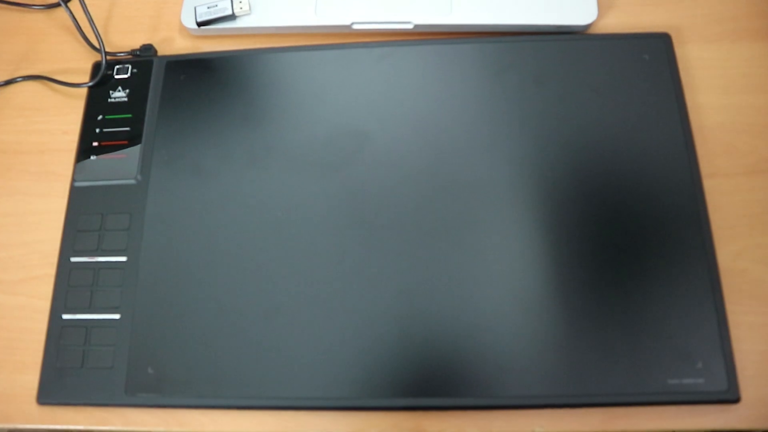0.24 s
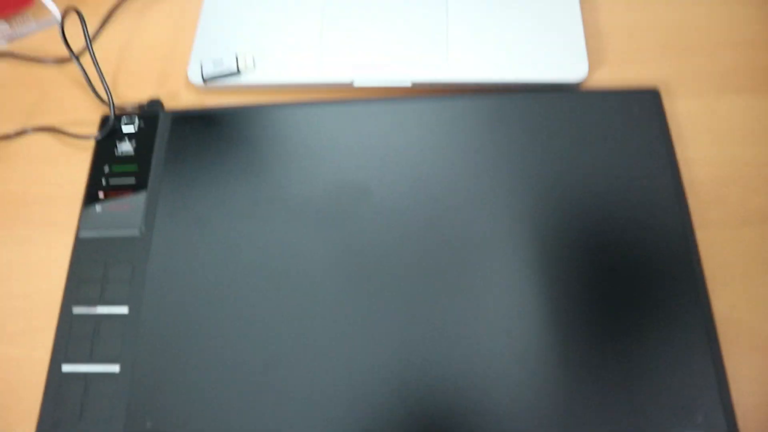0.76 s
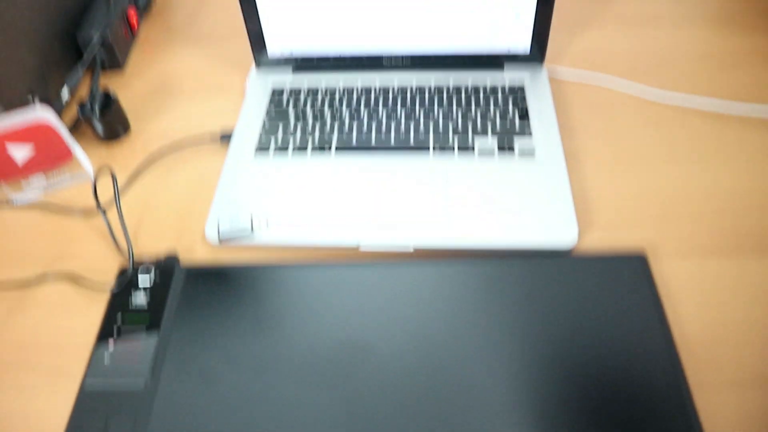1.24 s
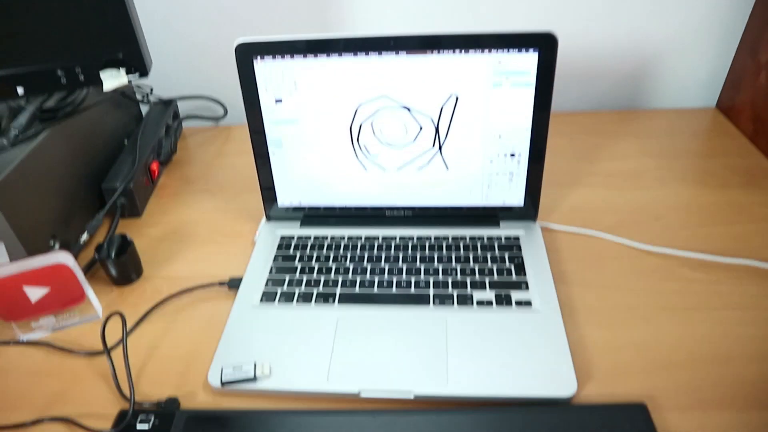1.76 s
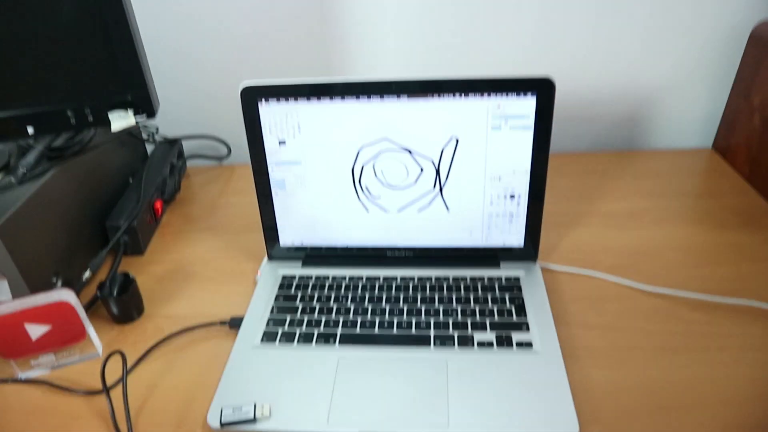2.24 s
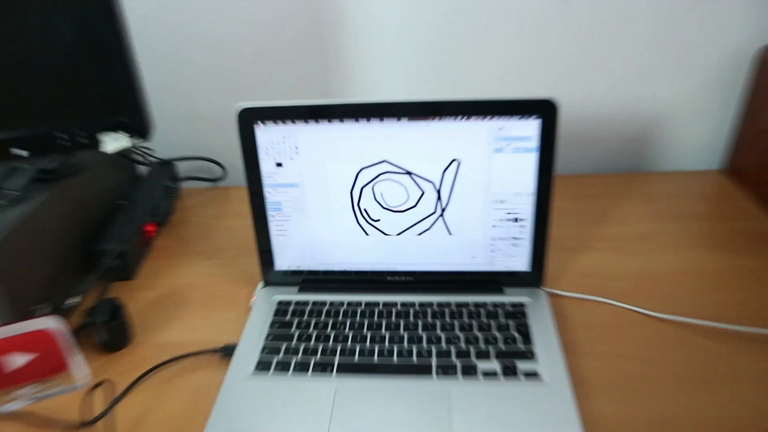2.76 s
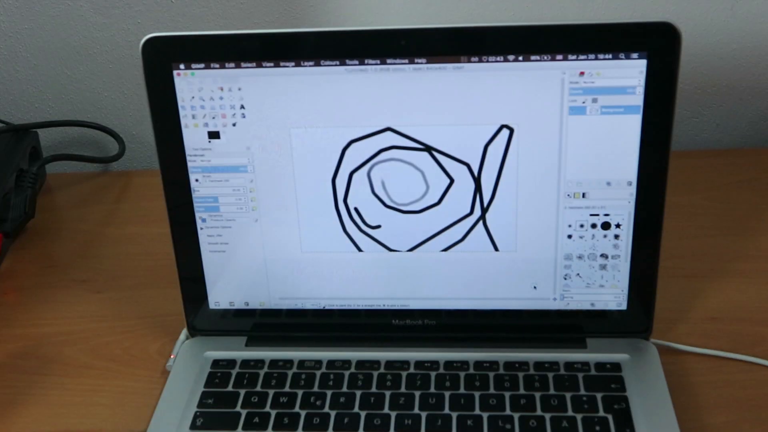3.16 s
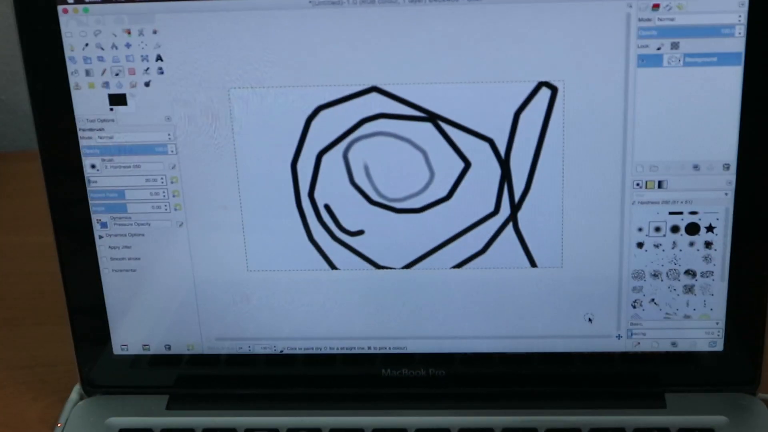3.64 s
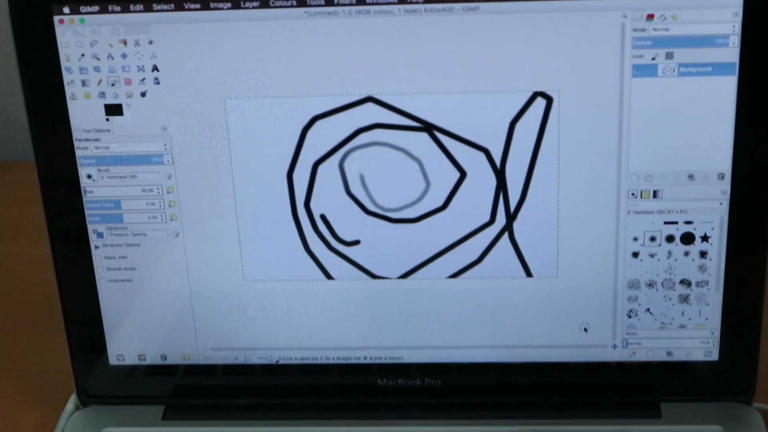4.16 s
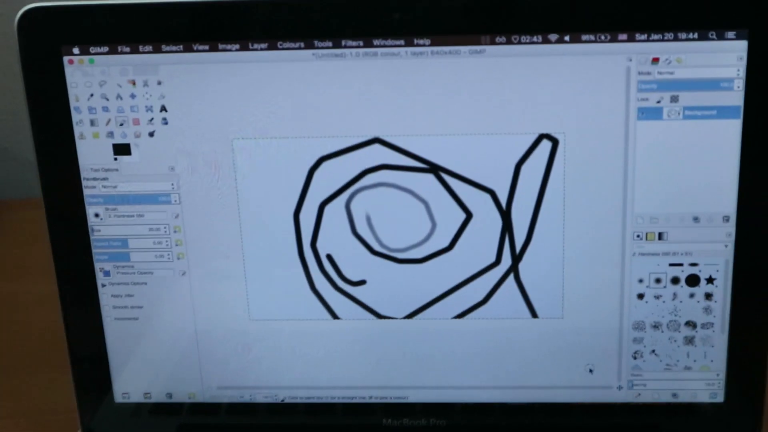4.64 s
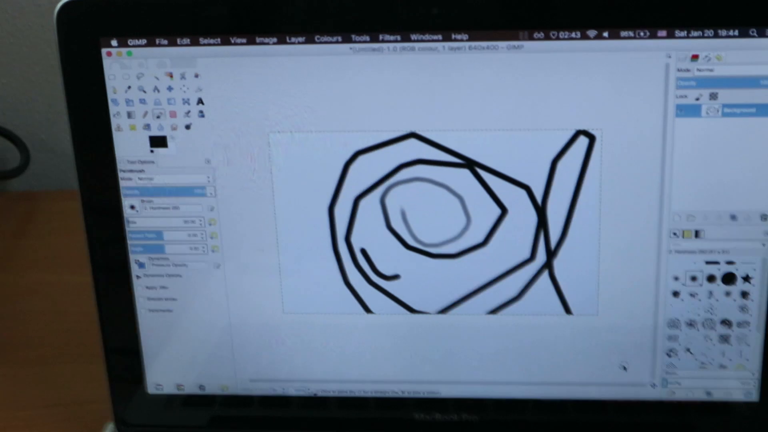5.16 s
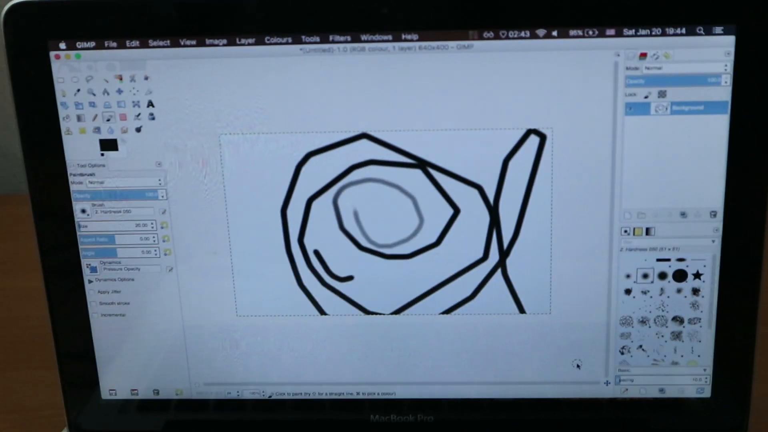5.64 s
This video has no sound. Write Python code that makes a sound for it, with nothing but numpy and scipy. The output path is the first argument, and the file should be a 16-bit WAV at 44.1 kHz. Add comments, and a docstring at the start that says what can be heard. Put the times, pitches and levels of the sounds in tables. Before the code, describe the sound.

A stylus works unevenly on a flat plastic plate lying on a wooden desk. Early hissy strokes and clustered taps give way to near quiet, then one hard click, overlapping dry scrapes, and scattered taps towards the end. Resting-hand rumble, short dull desk thuds and tiny plastic ticks accompany them, heard closely in stereo with a short small-room tail.

```python
"""Pen on a drawing tablet

A plastic nib taps and slides on a thin tablet lying on a wooden desk in a small quiet room.
Each tap is nib chatter ringing the tablet's modes; each stroke is friction noise that swells with speed.
The resting hand rubs as a low rumble, bumps the desk into short low rings and rattles the case in dense ticks.
Room and microphone noise lies beneath; a close hand-held camera hears all in stereo."""
import sys
import numpy as np
from scipy import signal
from scipy.fft import rfft, irfft, next_fast_len
from scipy.io import wavfile
from scipy.ndimage import uniform_filter1d, map_coordinates

SR = 44100
rng = np.random.default_rng(int(sys.argv[2]) if len(sys.argv) > 2 else 0)


def ratio(d):
    """dB to gain"""
    e = np.asarray(d, float) / 20
    return 10 ** e


def transcribe(u):
    """Save the signal u as a 16-bit wav file named by the first command-line argument.

    u: samples, shape (n,) or (channels, n), limited to [-1, 1]; the rate is SR.
    q: integer samples, one column per channel.
    """
    v = np.clip(np.atleast_2d(u).T, -1, 1)
    q = np.round(v * 32767).astype(np.int16)
    wavfile.write(sys.argv[1], SR, q)


N = 260190


def unit(x):
    """Normalisation: scales x to rms 1 along time."""
    return x / np.sqrt(np.mean(x ** 2, -1, keepdims=True) + 1e-20)


def along(points, hz):
    """Interpolation on a log frequency axis of (Hz, value) points."""
    f, v = np.transpose(points)
    return np.interp(np.log(hz + 1), np.log(f + 1), v)


def wobble(rate):
    """Slow random modulation: a smooth curve through rate random knots a second."""
    knots = rng.standard_normal(int(N * rate / SR) + 4)
    return map_coordinates(knots, [np.arange(N) * rate / SR])


def filtered(x, response):
    """Linear filtering: the spectrum of x times a response of frequency."""
    m = next_fast_len(N + 8192)
    return irfft(rfft(x, m) * response(np.fft.rfftfreq(m, 1 / SR)), m)[..., :N]


def coloured(spectrum, grit_db, rate, patchy_db=0):
    """Shaped noise: sum and difference of rms 1 flicker together, in patches of changing colour."""
    z = signal.stft(rng.standard_normal((2, N + 512)), nperseg=256)[2]
    field = uniform_filter1d(rng.standard_normal(z.shape[1:]), size=3, axis=0)
    field = uniform_filter1d(field, size=9, axis=1)
    patches = ratio(patchy_db * field / field.std())
    flicker = ratio(grit_db * wobble(rate))
    noise = flicker * signal.istft(z * patches, nperseg=256)[1][:, :N]
    return unit(filtered(noise, lambda hz: ratio(along(spectrum, hz))))


def add(track, sound, s):
    """Superposition: mixes a short sound into the track at s seconds."""
    spot = track[..., round(s * SR):round(s * SR) + sound.shape[-1]]
    spot += sound[..., :spot.shape[-1]]


# Colour of the quiet room and microphone noise. Each row: frequency in Hz, relative level in dB per Hz.
AIR_SPECTRUM = [(15, -29), (25, 0), (152, -6.5), (291, -8.5), (1010, -15), (1430, -19.5), (1780, -24.5),
                (1920, -22), (2090, -22), (9720, -43), (15800, -40.5)]


def air():
    """Stationary background noise: a faint hush of the room and microphones, gently flickering."""
    level_db = -56
    return ratio(level_db) * coloured(AIR_SPECTRUM, grit_db=1.5, rate=8, patchy_db=2)


# Rubbing of the hand through the desk. Each row: time in seconds, level in dB.
RUBBING = [(0.0, -59.5), (0.3, -49.5), (0.64, -39.5), (0.74, -53), (1.4, -59), (1.9, -48), (2.2, -60),
           (2.35, -92), (2.7, -99), (3.0, -46.5), (3.25, -86), (3.38, -53), (3.7, -75), (4.16, -59),
           (4.39, -52), (4.5, -49), (5.0, -51), (5.15, -65.5), (5.44, -39), (5.57, -86), (5.72, -45),
           (5.9, -87)]
# Colour of that rumble. Each row: frequency in Hz, relative level in dB per Hz.
RUMBLE_SPECTRUM = [(13, -29), (22, 16), (69, 18), (113, 14), (338, 2.5), (395, 2), (500, -13), (650, -54),
                   (1100, -120)]


def rubbing_db():
    """Amplitude envelope: the rubbing level at every sample, silent outside the table."""
    s, db = np.transpose(RUBBING)
    return np.interp(np.arange(N) / SR, s, db, -120, -120)


def rubbing():
    """Structure-borne friction: the hand's rubbing comes through the desk as a lumpy low rumble."""
    return ratio(rubbing_db()) * coloured(RUMBLE_SPECTRUM, grit_db=2.5, rate=11)


# Vibration modes of tablet and desk. Each row: frequency in Hz, relative level in dB, t60 in seconds.
MODES = [(125, -8, .05), (172, -4, .04), (330, -3, .04), (480, -3, .03), (660, -2, .03), (930, -14, .025),
         (1050, -5, .025), (1227, -8, .025), (1370, -2, .025), (1520, -7, .022), (1800, -3, .022),
         (2075, -2, .02), (2300, -6, .02), (2700, -6, .018), (3230, -6, .016), (4050, 0, .014),
         (4250, -3, .013), (4600, -1, .013), (5100, -6, .01), (5660, -4, .011), (6450, -5, .012),
         (6960, -4, .011), (7800, -5, .01), (8150, -5, .01), (8800, -9, .008), (9400, -10, .008),
         (10700, -14, .006), (14500, -9, .005)]


def case_resonance(f):
    """Modal superposition: damped resonators of alternating sign, softened towards the treble."""
    width_hz = 250
    total = 0
    for k, (hz, db, t60) in enumerate(MODES[3:15]):
        damping = 1j * f * width_hz
        total = total + (-1) ** k * ratio(db) * damping / (hz * hz - f * f + damping)
    return total / (1 + 1j * f / 2500) ** 2


def creaks():
    """Impulsive excitation: the loose plastic case rattles in dense soft ticks, most of them small."""
    ticks_per_s, size_range_db = 120, 9
    chance, size = rng.random((2, N))
    size_db = size_range_db * size ** 2  # many small, few large
    ticks = (chance < ticks_per_s / SR) * ratio(size_db + 0.7 * rubbing_db() + 11.5)  # follow the rubbing
    return filtered(ticks, case_resonance) * [[1.1], [.9]]


# Sliding strokes. Each row: fastest moment in seconds, speeding up in seconds, slowing down in seconds,
# scrape level in dB, hiss level in dB.
STROKES = [(.103, 0.021, 0.044, -52, -42), (0.137, 0.028, 0.033, -39, -33),
           (0.308, 0.035, 0.15, -52.5, -60.5), (0.481, 0.08, 0.05, -40.5, -53),
           (0.512, 0.031, 0.04, -48, -39), (.56, 0.041, 0.62, -57.5, -59), (1.145, 0.13, 0.034, -54.5, -63),
           (1.49, 0.048, 0.041, -54, -79), (1.902, 0.081, 0.088, -53.5, -53.5),
           (2.241, 0.023, 0.035, -36.5, -78), (2.547, 0.032, 0.078, -53, -56.5),
           (2.844, 0.036, 0.06, -44, -55.5), (2.89, 0.047, 0.071, -45, -54.5),
           (2.988, 0.097, 0.12, -37.5, -47), (3.074, 0.044, 0.047, -43.5, -53),
           (3.183, 0.045, 0.091, -47.5, -51.5), (3.306, 0.03, 0.026, -43, -55.5),
           (3.42, 0.04, 0.22, -39, -51), (3.552, 0.036, 0.04, -45, -55.5), (3.591, 0.055, 0.043, -43, -49),
           (3.684, 0.051, 0.043, -49.5, -61), (3.88, 0.062, 0.11, -76, -61), (4.80, 0.025, 0.056, -57, -79),
           (4.98, 0.05, 0.097, -63, -90), (5.1, 0.025, 0.036, -53, -80), (5.329, 0.02, 0.031, -58.5, -75),
           (5.375, 0.056, 0.034, -43, -73.5), (5.67, 0.011, 0.019, -60, -73.5),
           (5.76, 0.036, 0.014, -60, -80)]


def swells():
    """Speed-dependent friction: scrape and hiss gains swell to the fastest moment and fall again."""
    rest_db, roundness = -29.5, 1.45  # loss one speeding-up or slowing-down time from the fastest moment
    out = np.zeros((2, N))
    for s, up, down, scrape_db, hiss_db in STROKES:
        t = np.arange(-2 * up, 2 * down, 1 / SR)
        swell = ratio(rest_db * np.abs(t / np.where(t < 0, up, down)) ** roundness)
        add(out, ratio([[scrape_db], [hiss_db]]) * swell, s + t[0])
    return out


# Colour of the friction grains. Each row: frequency in Hz, relative level in dB per Hz.
SCRAPE_SPECTRUM = [(120, 6), (200, 4), (572, -3), (880, -2), (980, -14), (1340, -0.5), (1700, -9.5),
                   (2170, -6), (5000, -39), (6500, -49), (11000, -91)]


def scrape():
    """Source and resonator: friction grains excite the plate, whose modes colour them in part."""
    mode_share = .55

    def plate(f):
        total = 0
        for hz, db, t60 in MODES[4:15]:
            width = 0.85 / t60  # short rings make broad peaks
            total = total + ratio(db) * width / (hz - f + 1j * width)
        return 1 + mode_share * abs(total)

    grains = coloured(SCRAPE_SPECTRUM, grit_db=3.3, rate=250, patchy_db=3)
    return unit(filtered(grains, plate))


# Colour of the nib tip's hiss. Each row: frequency in Hz, relative level in dB per Hz.
HISS_SPECTRUM = [(2060, 5.5), (3500, 9), (4950, -2), (7940, -8.5), (10100, -15), (15000, -11.5),
                 (15800, -29)]


def hiss():
    """Fine-grained friction: the nib tip gives a quickly flickering noise."""
    return coloured(HISS_SPECTRUM, grit_db=3, rate=300, patchy_db=2.5)


def singing():
    """Narrow-band resonance: one mode turns flat noise into a wavering whistle."""
    mode_hz, width_hz = 1366, 100
    noise = coloured([(100, 0)], grit_db=4, rate=35)
    return unit(filtered(noise, lambda f: 1 / (1 + (2 * (f - mode_hz) / width_hz) ** 2)))


def strokes():
    """Sliding friction: scrape and hiss swell with the pen; hard, fast strokes make a mode sing."""
    scrape_gain, hiss_gain = swells()
    sing_gain = ratio(7) * (scrape_gain * hiss_gain) ** .6
    flutter = ratio(.8 * wobble(40))  # uneven pen speed
    direct = flutter * (scrape_gain * scrape() + hiss_gain * hiss() + sing_gain * singing())
    echo = unit(room(np.zeros(4))) / SR ** .5
    return direct + ratio(-12.5) * signal.fftconvolve(direct, echo, axes=1)[:, :N]


# Reverberation of the room. Each row: frequency in Hz, t60 in seconds.
ROOM_T60 = [(150, 0.26), (700, 0.21), (2000, 0.36), (5000, 0.29), (10000, 0.24)]
# Colour of the reverberation. Each row: frequency in Hz, relative level in dB.
ROOM_COLOUR = [(40, -69), (120, -42), (400, 15.5), (1200, -3.5), (2800, -1.5), (5000, -9.5), (8000, -17.5),
               (12000, -39)]


def room(band_db):
    """Diffuse decay: a fresh noise tail follows the source's four bands, each frequency dying at its pace."""
    hz, t, z = signal.stft(rng.standard_normal((2, SR // 3)), SR, nperseg=256)
    source_db = along(list(zip([300, 1200, 2700, 6000], band_db)), hz)
    colour_db = along(ROOM_COLOUR, hz) + source_db
    decay_db = 60 * t / along(ROOM_T60, hz)[:, None]
    fade = ratio(colour_db[:, None] - decay_db) * (1 - .5 * np.exp(-t / 0.0011))  # echoes gather
    # some frequencies linger, others drop out
    lumps_db = 15 * uniform_filter1d(rng.standard_normal(fade.shape), size=30, axis=1)
    tail = signal.istft(z * fade * ratio(lumps_db), SR, nperseg=256)[1]
    return tail * np.minimum(np.arange(tail.shape[1]) / 200, 1)


def struck_modes(t):
    """Modal decay: each mode rings after a short thud, softened because the contact passes little above it."""
    soften = 1.545  # low-pass corner over the mode's frequency
    hz, level_db, t60 = np.transpose(MODES)[:, :, None]
    swing = ratio(level_db) * np.sin(2 * np.pi * hz * t) * (1 - np.exp(-t / 0.00006))
    rings = swing * ratio(-60 * t / t60)
    thuds = swing * ratio(-60 * t / t60 * 43.4)  # the modes held down by the hand
    struck = []
    for f, sound in zip(hz[:, 0], rings + 3.28 * thuds):
        contact = signal.butter(4, min(soften * f, SR / 2.2), fs=SR, output='sos')
        struck.append(signal.sosfilt(contact, sound))
    return np.array(struck)


def nib_force(lead_s):
    """Contact force: a faint noise swells for lead_s seconds before the chatter and its one full blow."""
    chatter_t60_s, blow_delay_s, blow = .011, .0009, 3
    late = np.arange(800) / SR - lead_s
    lead_in = .1 * ratio(20 * late / .006)
    landing = (.2 + late / .0015) * ratio(-60 * late / chatter_t60_s)
    force = np.where(late < 0, lead_in, landing) * rng.standard_normal(800)
    add(force, -blow * np.hanning(12), lead_s + blow_delay_s)  # a quarter millisecond long
    return force


# Nib contacts. Each row: landing in seconds, ring level of the plate in dB rms, then over that level the
# desk knock in dB, snap in dB and nib brightness in dB, mode that the struck spot favours in Hz.
TAPS = [(0.126, -51, -10, 1.5, -10, 2700), (0.138, -42, -33, -8.5, -19, 1370),
        (0.302, -61.5, 2, -15, -34, 1290), (0.446, -64, -10, -15, -30, 1380),
        (0.456, -57.5, 9.5, 3, -6, 4700), (0.484, -56.5, 11.5, 8.5, -2.5, 3100),
        (0.496, -60, -6, 5, -19, 2220), (0.505, -57, -6, 1, -23, 1750), (0.51, -42, -7, -5.5, -26, 1760),
        (0.54, -63, -10, 5.5, -14, 1400), (0.581, -58.5, 1, -8, -25, 1227),
        (0.639, -63, 15.5, -10, -30, 330), (0.654, -54.5, 7, 0.5, -31, 2680),
        (0.716, -57, 5, -8, -1.5, 4230), (0.735, -36.5, 5, -2.5, -15, 3060),
        (0.754, -52, 4, -12, -14, 1390), (0.777, -59.5, 14, -17, -22, 495),
        (1.658, -70.5, 14, -1, -10, 330), (1.941, -49, -5, 3.5, -16, 3270),
        (2.004, -56, 10, 1.5, -18, 2700), (2.248, -28, -4.5, -6.5, -10, 1210),
        (2.558, -51.5, 6, -18, -43, 1280), (2.578, -33, 1, -1.5, -16.5, 1140),
        (2.623, -59, 15, -9, -20, 350), (2.646, -50.5, -8, -10, -21, 1470),
        (2.838, -72.5, 18.5, 9, -41, 2700), (3.142, -66.5, -15, 0, -14, 2700),
        (3.177, -54, 0, -18, -28, 1350), (3.218, -61.5, -23, 10.5, -6.5, 3300),
        (3.304, -77, -14, -16, -30, 1440), (3.39, -64.5, 10.5, -6, -19, 330),
        (3.414, -55, 8, -21, -33, 473), (3.539, -55, -17, -25, -29, 1400),
        (3.904, -50.5, -0.5, -7, -23, 1450), (3.97, -68, 12.5, -21, -32, 480),
        (3.997, -48, 3, -10.5, -40, 1670), (4.06, -29.5, -3.5, -4.5, -15.5, 2050),
        (4.294, -45.5, -4, -12, -25, 1550), (4.313, -34, 4.5, -3.5, -15.5, 465),
        (4.319, -44.5, 6.5, 4, -16.5, 2440), (4.538, -49.5, 7.5, -2, -19, 1320),
        (4.549, -33, 1, -5, -16.5, 1740), (4.737, -61.5, 1, -64, -49, 1300),
        (4.778, -50.5, 0, -8, -38, 1630), (4.871, -64, 9, 1.5, -10.5, 2270),
        (4.934, -65, 11, -1, -12.5, 3120), (4.943, -54.5, -7, -6.5, -39, 1500),
        (4.963, -57.5, 3, -10, -42, 1500), (4.973, -65, 5, -18, -39, 1500), (5.005, -77, 4, 0, -32, 2070),
        (5.02, -70.5, 13, -19, -33, 635), (5.044, -69.5, 8, 0.5, -31, 2680),
        (5.067, -77, 21.5, 6, -36, 1370), (5.096, -70.5, 16, 8, -23, 2950),
        (5.105, -80, -1, 10.5, -35, 2340), (5.295, -72, 12, -21, -32, 330), (5.32, -67, -1, -13, -28, 1490),
        (5.354, -45, -7.5, -9, -22.5, 1780), (5.385, -64, 10, -10, -32, 1510),
        (5.413, -53, -0.5, -25, -44, 1480), (5.429, -43.5, 2, -11.5, -22.5, 520),
        (5.599, -58.5, 1.5, -6, -50, 1820), (5.663, -77.5, -2, 9.5, -30, 2100),
        (5.672, -84, 1.5, 4, -29.5, 2250), (5.699, -55.5, 4.5, 1, -48, 2540),
        (5.744, -76, 6, 1.5, -28, 1500), (5.76, -76, 18, 8.5, -35, 2300),
        (5.859, -51.5, -3.5, -4, -11, 2220), (5.889, -51.5, -9, -2, -23.5, 1190)]


def taps():
    """Impact excitation: a few ms of nib chatter ring the modes at new strengths, then fill the room."""
    favour_lift_db, favour_reach_oct = 8.5, 0.09
    tilt, usual_bright_db = .61, -12.5  # dB per octave for each dB over the usual brightness
    spread_db, flipped_share, lead_s = 2.1, .25, .008
    out = np.zeros((2, N))
    struck = struck_modes(np.arange(SR // 10) / SR)
    hz = np.transpose(MODES)[0]
    octaves = np.log2(np.maximum(hz, 4000) / 4000)
    bands = np.digitize(hz, [700, 1900, 3600]) == np.arange(4)[:, None]  # knock, ring, snap, brightness
    for s, db, knock_db, snap_db, bright_db, spot_hz in TAPS:
        favour_db = favour_lift_db * np.exp(-(np.log2(hz / spot_hz) / favour_reach_oct) ** 2)
        tilt_db = tilt * (bright_db - usual_bright_db) * octaves  # brighter blows lean to the top modes
        force = nib_force(lead_s)
        spread = ratio(spread_db * rng.standard_normal((2, 1, len(hz))))
        sign = np.where(rng.random(len(hz)) < flipped_share, -1, 1)  # the spot struck turns some modes over
        strengths = bands * spread * sign * ratio(favour_db + tilt_db)
        parts = signal.fftconvolve(strengths @ struck, force[None, None], axes=2)
        band_db = db + np.array([knock_db, 0, snap_db, bright_db])
        blow = np.sum(ratio(band_db)[:, None] * unit(parts), 1)
        add(out, blow * [[1.1], [.9]], s - lead_s)
        add(out, ratio([[9], [3]]) * room(band_db), s + 0.001798)
    return out


# Soft bumps of the hand, and a few desk thuds just after loud taps (near 2.62, 4.56 and 4.60 s). Each row:
# start in seconds, level in dB, pitch in Hz.
BUMPS = [(0.283, -39, 73), (0.428, -23, 180), (0.544, -25.5, 196), (0.596, -57, 118), (0.63, -34, 180),
         (1.141, -42, 389), (1.658, -38.5, 107), (1.954, -54, 111.4), (2.624, -28.5, 174),
         (3.155, -35, 106), (3.227, -32, 76), (3.307, -28.5, 135), (3.327, -33, 187), (4.19, -32.5, 282),
         (4.56, -20, 111), (4.601, -27.5, 105), (4.736, -33, 287), (4.875, -32, 168), (4.946, -25.5, 167),
         (5.06, -32, 113), (5.307, -37, 192), (5.365, -30.5, 205), (5.431, -33, 180), (5.67, -37, 178),
         (5.749, -34.5, 107)]


def bumps():
    """Damped oscillation: hand bumps, and the desk springing back after each tap, ring a few low cycles."""
    rebound_s, rebound_db, rebound_hz = 0.02114, 1.5, 106  # delay, level over the knock, pitch
    out, t = np.zeros(N), np.arange(SR // 8) / SR
    rebounds = [(s + rebound_s, db + knock_db + rebound_db, rebound_hz) for s, db, knock_db, *_ in TAPS]
    for s, db, hz in BUMPS + rebounds:
        overtone_hz = hz * rng.uniform(1.23, 2.236)
        ring = np.sin(2 * np.pi * hz * t) + 0.31 * np.sin(2 * np.pi * overtone_hz * t)
        add(out, ratio(db - 60 * t / 0.084) * (1 - np.exp(-t / 0.00054)) * ring, s)
    return out * [[1], [.5]]


# Level of the channel difference. Each row: frequency in Hz, difference over sum in dB.
DIFFERENCE_LEVEL = [(40, -34), (150, -14.5), (400, 0), (700, -7.5), (1250, -4), (1600, -0.5), (1900, 12),
                    (2150, 3.5), (2500, 4.5), (3400, -1), (4500, 5.5), (5500, 5), (7000, 2), (9000, 5.5),
                    (15000, 5.5)]
# Colour of the channel sum, weak in the deep bass and near 2 kHz. Each row: frequency in Hz, level in dB.
SUM_COLOUR = [(25, -8), (60, -10), (110, 0), (690, -2), (810, -2.5), (950, 0.5), (1750, 1.5), (1930, -7),
              (2060, 0), (9000, 4), (10000, 0), (15000, -2)]
# Phase by which the difference leads the sum. Each row: frequency in Hz, phase in radians.
DIFFERENCE_PHASE = [(200, 1.6), (500, 1.64), (800, 1.4), (1250, 0.93), (1900, 1.36), (4000, 1.78),
                    (9000, 1.35)]


def stereo_colour(hz):
    """Stereo colouring: the recorder gives sum and difference of its channels their own level and phase."""
    difference = ratio(along(DIFFERENCE_LEVEL, hz)) * np.exp(1j * along(DIFFERENCE_PHASE, hz))
    return ratio(along(SUM_COLOUR, hz)) * np.array([np.ones(len(hz)), difference])


def scene():
    """Superposition of all sources as sum and difference, turned into the two channels."""
    sources = air() + rubbing() + creaks() + strokes() + taps() + bumps()
    both, apart = filtered(sources, stereo_colour)
    return np.array([both + apart, both - apart])


def low_pass(x):
    """Removes everything above the highest recorded frequency."""
    return signal.sosfilt(signal.butter(12, 15940, fs=SR, output="sos"), x)


def record(dry):
    mix = filtered(dry, lambda hz: hz < 15900)
    return low_pass(mix)


dry = scene()
out = record(dry)
transcribe(out)
```